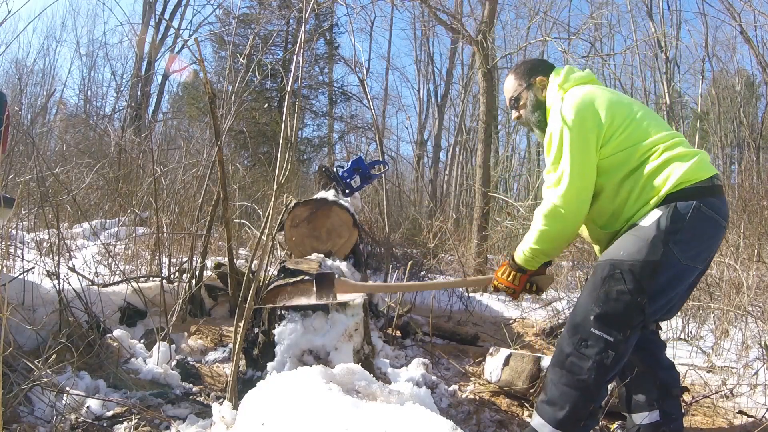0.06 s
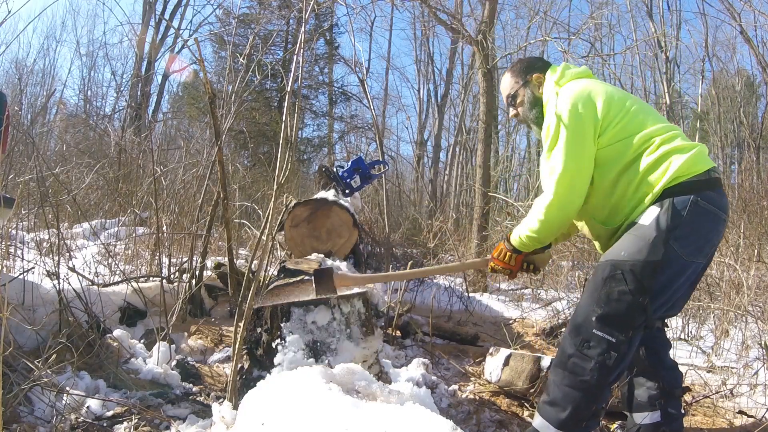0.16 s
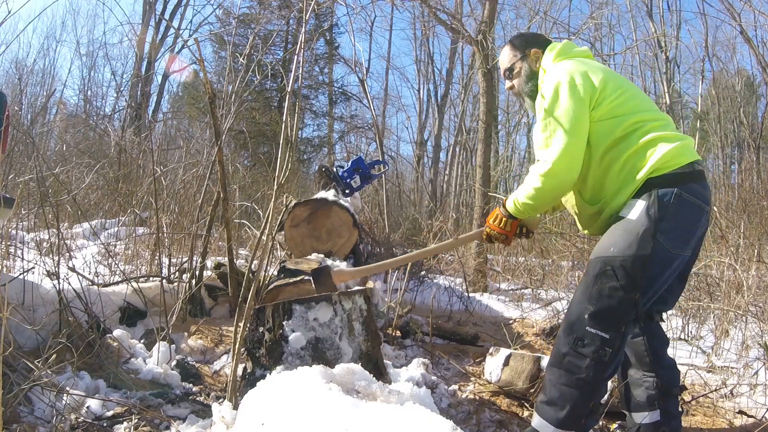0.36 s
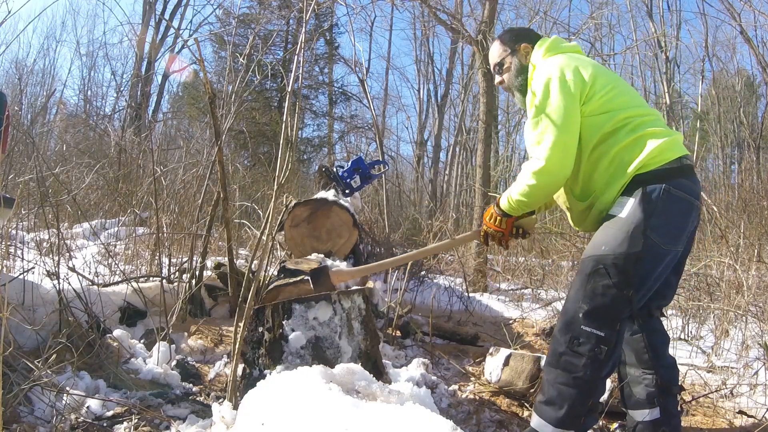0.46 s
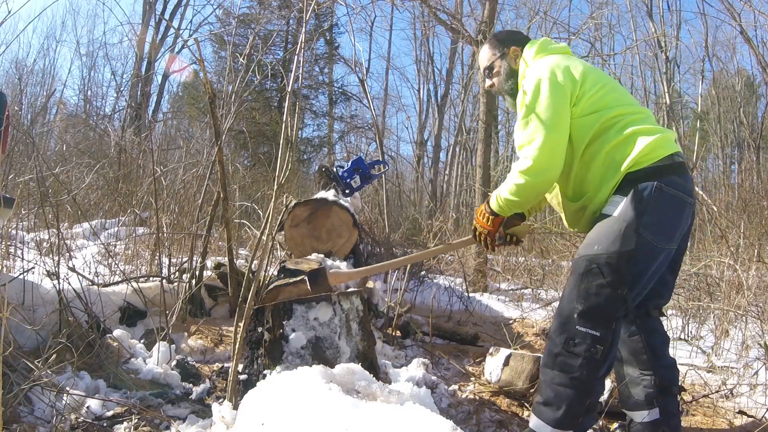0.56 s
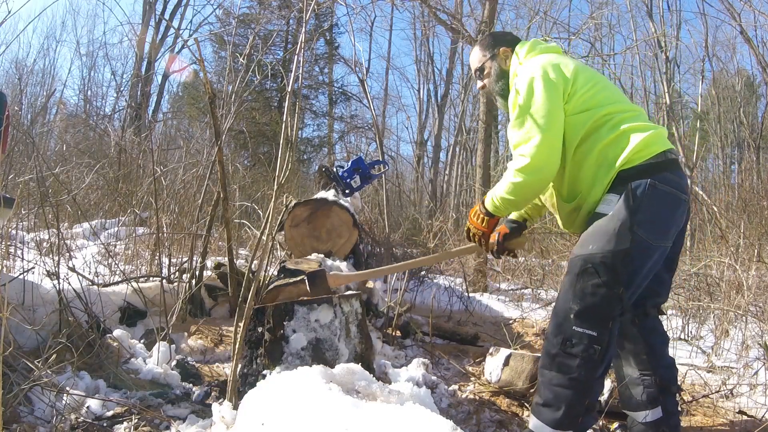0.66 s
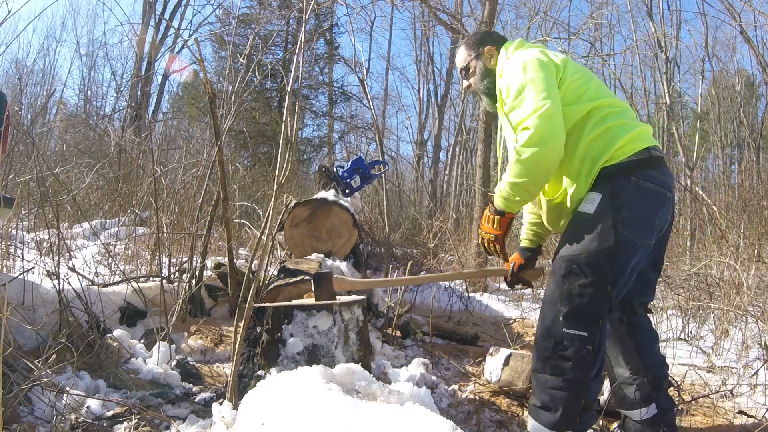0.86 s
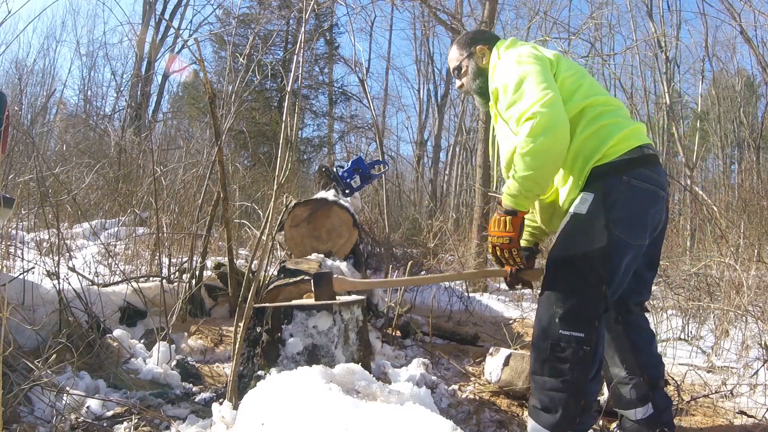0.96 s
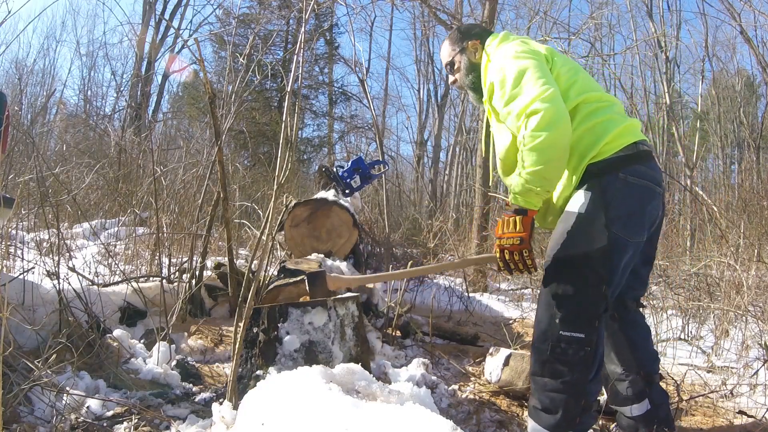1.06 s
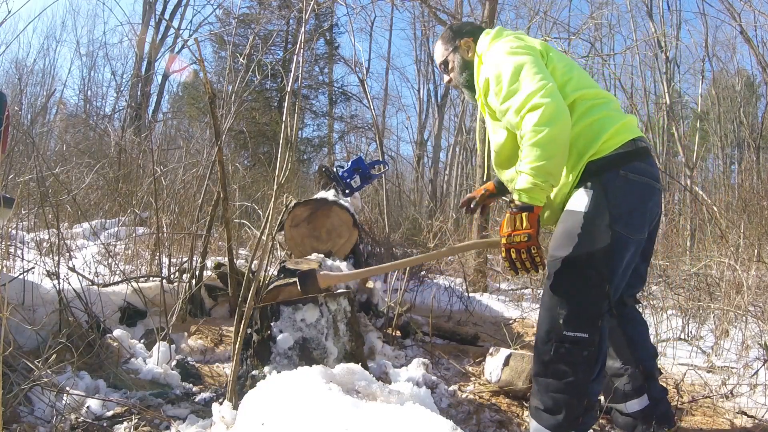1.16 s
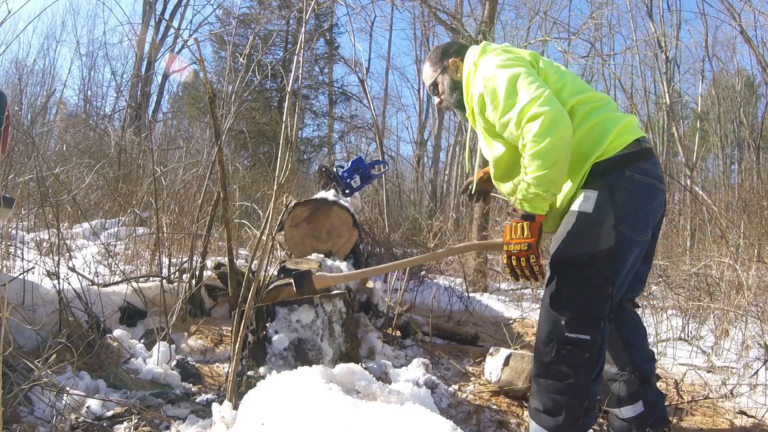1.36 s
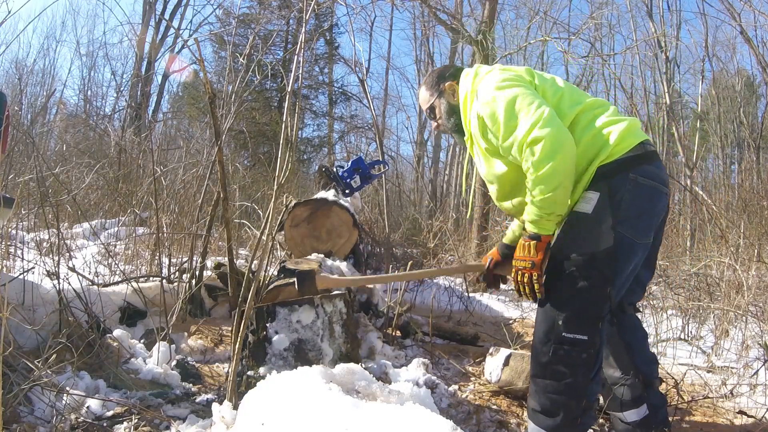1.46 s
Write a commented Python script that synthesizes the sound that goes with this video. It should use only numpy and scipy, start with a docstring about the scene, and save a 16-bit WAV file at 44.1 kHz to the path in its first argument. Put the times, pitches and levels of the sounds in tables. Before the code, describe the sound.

Outdoors in quiet woods, faint hiss and rustling precede one very loud, dry axe blow into wood, overloaded on a close small microphone, followed by scattered echoes, tiny snaps, soft woody knocks and sleeve rustle.

```python
"""Recorder hiss, a low rumble and grainy rustling (all shaped noise) lie under the whole scene.
In a quiet snowy wood an axe touches a log on a stump, then bites in and overloads a small recorder.
The log rings as fading sine tones, its fibres tear as gritty noise and the trees scatter echoes.
Two splinters snap; then the axe is worked loose with more ticks and with dull knocks.
Ticks are short noise bursts, knocks are bursts that also ring the log."""
import sys
import numpy as np
from scipy import signal
from scipy.fft import rfft, irfft
from scipy.io import wavfile
from scipy.ndimage import uniform_filter1d, minimum_filter1d

SR = 44100
rng = np.random.default_rng(int(sys.argv[2]) if len(sys.argv) > 2 else 0)


def convert_level_to_amplitude(level_db):
    """Map a level in decibels to its linear amplitude factor."""
    exponent = np.asarray(level_db, float) / 20
    return 10 ** exponent


def store_wav(level_fs):
    """Save 16-bit WAV to argv[1]."""
    pcm = np.round(np.clip(np.atleast_2d(level_fs), -1, 1) * 32767)
    wavfile.write(sys.argv[1], SR, pcm.T.astype(np.int16))


N = 66150  # length in samples

# Steady recorder hiss. Each row: frequency in Hz, relative level per Hz in dB.
HISS_SPECTRUM = [(90, 2.5), (150, -1), (300, -11), (700, -8), (1100, -14.5), (2000, -16.5), (4300, -24.5),
                 (5700, -24.5), (6450, -9.5), (7200, -16.5), (9500, -24), (13000, -28), (14000, -33)]
# Distant low rumble. Each row: frequency in Hz, relative level per Hz in dB.
RUMBLE_SPECTRUM = [(15, -30), (28, 2), (40, -1), (55, 1), (70, -7.5), (110, -21)]
HISS_DB, RUMBLE_DB = -47.5, -39

# How busily sleeves and gloves move. Each row: time in seconds, level in dB.
CLOTH_MOVES = [(0, -51.5), (.1, -57.5), (.35, -53), (.5, -63), (.57, -54), (.7, -48), (.8, -51), (.95, -67),
               (1.1, -57.5), (1.14, -51), (1.3, -47), (1.39, -48), (1.42, -59), (1.5, -68)]
# Low shuffle of the axe in the cut. Each row: time in seconds, level in dB.
AXE_SHUFFLE = [(0, -43), (.1, -51.5), (.4, -57), (.55, -61), (.62, -41), (.72, -41), (.82, -46), (1, -53.5),
               (1.18, -49.5), (1.27, -52), (1.35, -45), (1.45, -60), (1.5, -52)]
# Colour of the cloth. Each row: frequency in Hz, relative level per Hz in dB.
CLOTH_SPECTRUM = [(500, -12), (1200, -3), (2500, 1), (4000, -7), (5500, -2), (7000, -5.5), (10000, -15.5)]
# Colour of wood and snow. Each row: frequency in Hz, relative level per Hz in dB.
WOOD_SPECTRUM = [(70, -2.5), (150, 4.5), (320, 1), (700, -13), (1200, -10), (2500, -20)]

# How long the trees' echoes last. Each row: frequency in Hz, time to fall 60 dB in seconds.
TREE_DECAY = [(100, .5), (400, 0.87), (950, 1.16), (2000, 0.67), (6000, 0.84), (12000, 0.65)]
# Colour of the trees' echoes. Each row: frequency in Hz, relative starting level in dB.
TREE_SPECTRUM = [(100, -2), (150, 10), (400, -6), (650, 0.5), (980, 3), (1500, -2.5), (4000, -0.5),
                 (6400, -5.5), (10000, -5.5)]
TREES_DB, TREES_RING_DB = -28.5, -17  # the low ring carries less far than the crack

# Short bright ticks: the first two are splinters snapping, the rest come from handling the axe.
# Each row: start in seconds, level in dB, lowest frequency in Hz, highest frequency in Hz,
# time to fall 60 dB in seconds.
TICKS = [(0.167, -25.5, 800, 7060, 0.041), (.193, -31, 500, 6000, .04), (.2574, -40, 4200, 7000, 0.026),
         (.314, -35, 700, 6840, 0.038), (.387, -41.5, 1490, 6540, .05), (.46, -43, 4460, 7260, 0.025),
         (0.5812, -31, 890, 7050, 0.058), (0.6554, -27.5, 2500, 8400, 0.029),
         (.656, -30.5, 1500, 2600, 0.028), (0.6986, -31.5, 1500, 3150, 0.022),
         (.7265, -31.5, 1800, 3240, 0.014), (0.8924, -38, 795, 6900, 0.02),
         (1.1774, -41.5, 1110, 1970, .03), (1.2153, -45, 3500, 6500, 0.028),
         (1.3879, -35, 1010, 2950, 0.028)]
# Dull knocks of the axe in the wood. Each row: start in seconds, level in dB, lowest frequency in Hz,
# highest frequency in Hz, time to fall 60 dB in seconds.
KNOCKS = [(.29, -40, 700, 1190, 0.19), (0.313, -33.5, 740, 1703, 0.072), (.322, -30.5, 99, 296, 0.11),
          (.385, -39.5, 99.9, 200, .15), (.579, -34.5, 200, 1180, 0.11), (.611, -36.5, 200, 905, 0.17),
          (0.69, -30, 250, 1460, 0.058), (.702, -34, 180, 450, .07), (.7235, -30, 300, 1480, 0.062),
          (.796, -29.5, 440, 2290, 0.047), (1.183, -34, 90, 750, .07), (1.346, -37, 110, 600, 0.068)]
KNOCK_RING_DB = -8.5  # the log's ring, against the level of the knock
SNAP = 6.8  # height of the first contact, against the grit around it
MIC_HZ, MIC_WIDTH_HZ, MIC_DB = 6210, 510, 11  # a narrow lift in the microphone port, heard in bursts

# Log, stump and ground under a blow. Each row: starting pitch in Hz, level in dB,
# time to fall 60 dB in seconds, time constant of the rise in seconds.
LOG_MODES = [(47.6, -21, .22, .03), (82.6, -10.5, 0.12, 0.019), (137.9, 5, 0.063, 0.0065),
             (163.4, -10.5, 0.11, 0.0065), (279.6, -15.5, 0.072, 0.0064), (369, 5, 0.025, 0.0022),
             (618, -8.5, 0.0538, 0.0043), (700, -8, 0.046, 0.0014), (838.8, 6, 0.024, 0.0016),
             (1003, -8, 0.047, 0.0028), (1311, -7.5, 0.034, 0.00095), (1592, -10.5, 0.022, 0.00098),
             (1895, -4.5, 0.024, 0.00067), (2198, -11, 0.037, 0.00072), (2547, -14.5, 0.032, 0.00085)]
SAG, SAG_S = 0.044, 0.04  # after the blow the ring drops by this share of its pitch as the log settles
# Fibres tearing. Each row: frequency in Hz, relative level per Hz in dB.
CRACK_SPECTRUM = [(300, 4), (1000, -1.5), (3000, -4.5), (4500, -13), (6300, -1.5), (8000, -22.5),
                  (13000, -29), (16000, -47)]
# Splinters crackling on after the blow. Each row: frequency in Hz, relative level per Hz in dB.
SPLINTER_SPECTRUM = [(250, -3), (600, 0.5), (1100, -1), (2500, -9), (4500, -12.5), (6300, -7), (7500, -19)]
CRACK_DB, CRACK_T60_S = -5, 0.035  # against the level of the chop
SPLINTER_DB, SPLINTER_T60_S = -26, 0.14  # against the level of the chop
TOUCH_S, TOUCH_DB, TOUCH_HIGH_HZ = 0.1287, -20, 3500  # the edge first touches the bark
CHOP_S, CHOP_DB = 0.1344, 14

AHEAD_S, TRIP_DB = 0.0295, -12  # the gain control sees sound above this level this early
DUCK_DB, DUCK_S = 5.5, 0.061  # depth and time constant of the quick recovery
HOLD_DB, HOLD_S = 5.5, 2.2  # depth and time constant of the slow recovery
CEILING = 1.04  # overload level


def evened(x):
    """Scales a sound to an average (rms) strength of one."""
    return x / np.sqrt(np.mean(x ** 2) + 1e-20)


def read(points, hz):
    """Reads a table between its rows, spacing frequencies by their logarithm."""
    f, value = np.transpose(points)
    return np.interp(np.log(hz + 1), np.log(f + 1), value)


def curve(points):
    """Turns a table of times and levels into a smooth volume curve."""
    s, db = np.transpose(points)
    return convert_level_to_amplitude(np.interp(np.arange(N) / SR, s, db))


def add(mix, s, sound):
    """Lays a sound into the mix at a start time, cutting off what runs past the end."""
    part = mix[round(s * SR):][:len(sound)]
    part += sound[:len(part)]


def coloured(x, points):
    """Filters by a spectrum table, steep beyond its ends."""
    hz = np.fft.rfftfreq(len(x), 1 / SR)
    ends = [(points[0][0] / 2, -70)] + list(points) + [(points[-1][0] * 1.1, -90)]
    return evened(irfft(rfft(x) * convert_level_to_amplitude(read(ends, hz)), len(x)))


def gritty(count, per_s, spread_db, smooth):
    """Steady noise plus sparse clicks of uneven size."""
    boost_db = spread_db * np.minimum(rng.exponential(1, count), 4)
    size = convert_level_to_amplitude(boost_db) * (rng.random(count) < per_s / SR)
    clicks = evened(size * rng.choice([-1., 1.], count))
    return clicks + smooth * rng.standard_normal(count)


def hiss_and_rumble():
    """Steady recorder hiss and a distant low rumble, each made of shaped noise."""
    hiss = convert_level_to_amplitude(HISS_DB) * coloured(rng.standard_normal(N), HISS_SPECTRUM)
    rumble = convert_level_to_amplitude(RUMBLE_DB) * coloured(rng.standard_normal(N), RUMBLE_SPECTRUM)
    return hiss + rumble


def rustle():
    """Cloth above, wood and snow below: grainy noise that swells with movement."""
    cloth = curve(CLOTH_MOVES) * coloured(gritty(N, 2800, 3.6, 0.62), CLOTH_SPECTRUM)
    shuffle = curve(AXE_SHUFFLE) * coloured(gritty(N, 800, 2., 1.), WOOD_SPECTRUM)
    return cloth + shuffle


def trees(x):
    """Scattered echoes, each band dying at its own speed."""
    hz, t, z = signal.stft(gritty(SR, 1500, 3.8, 0.15), SR, nperseg=256)
    fading_db = read(TREE_SPECTRUM, hz)[:, None] - 60 * t / read(TREE_DECAY, hz)[:, None]
    tail = signal.istft(z * convert_level_to_amplitude(fading_db), SR, nperseg=256)[1]
    tail = tail * np.minimum(np.arange(len(tail)) / (0.0085 * SR), 1)  # echoes build up over 8.5 ms
    return convert_level_to_amplitude(TREES_DB) * signal.fftconvolve(x, tail / np.linalg.norm(tail))[:N]


def burst(db, low_hz, high_hz, t60, rise):
    """A short gritty burst between two pitches, with one snap as it reaches full strength."""
    t = np.arange(8192) / SR
    f = np.fft.rfftfreq(len(t), 1 / SR) + 1  # the 1 avoids dividing by zero
    edges = (1 + (low_hz / f) ** 4) * (1 + (f / high_hz) ** 6)
    mic_lift = convert_level_to_amplitude(MIC_DB * np.exp(-((f - MIC_HZ) / MIC_WIDTH_HZ) ** 2))
    band = mic_lift / edges / np.sqrt(f)
    snap = SNAP * (np.arange(len(t)) == round(rise * SR))
    grit = gritty(len(t), 3000, 3.2, 0.97) + snap
    return convert_level_to_amplitude(db - 60 * t / t60) * np.minimum(t / rise, 1) * evened(irfft(rfft(grit) * band))


def ring(sag, weight):
    """The log's own tones after a blow, each swelling, fading and sinking in pitch by the sag."""
    t = np.arange(SR // 2) / SR
    slowed = t - sag * (t - SAG_S * (1 - np.exp(-t / SAG_S)))
    total = np.zeros(len(t))
    for hz, db, t60, rise in LOG_MODES:
        loudness = weight(hz) * convert_level_to_amplitude(db - 60 * t / t60) * (1 - np.exp(-t / rise))
        total += loudness * np.sin(2 * np.pi * hz * slowed)
    return total


def ticks_and_knocks():
    """Ticks of splinters and handling, and knocks that also ring the log in their own range."""
    out = np.zeros(N)
    for s, db, low_hz, high_hz, t60 in TICKS:
        add(out, s, burst(db, low_hz, high_hz, t60, 0.0012))
    for s, db, low_hz, high_hz, t60 in KNOCKS:
        add(out, s, burst(db, low_hz, high_hz, t60, 0.0025))
        log_ring = ring(0, lambda f: 1 / (1 + (low_hz / f) ** 4) / (1 + (f / high_hz) ** 4))
        add(out, s, convert_level_to_amplitude(db + KNOCK_RING_DB) * log_ring)
    return out


def chop():
    """Touch, blow and tearing fibres: returns the log's ring and the crack apart."""
    body, crack, t = np.zeros(N), np.zeros(N), np.arange(SR // 2) / SR
    tear = coloured(gritty(len(t), 4000, 3.3, 0.67), CRACK_SPECTRUM)
    tear *= np.minimum(t / 0.0028, 1)  # the tear opens over 2.8 ms
    tear *= convert_level_to_amplitude(CRACK_DB - 60 * t / CRACK_T60_S)
    splinters = coloured(gritty(len(t), 900, 3.1, 0.5), SPLINTER_SPECTRUM)
    tear += convert_level_to_amplitude(SPLINTER_DB - 60 * t / SPLINTER_T60_S) * splinters
    add(crack, TOUCH_S, burst(TOUCH_DB, 530, TOUCH_HIGH_HZ, 0.2, 0.0043))
    add(crack, CHOP_S, convert_level_to_amplitude(CHOP_DB) * tear)
    add(body, CHOP_S, convert_level_to_amplitude(CHOP_DB) * ring(SAG, lambda hz: 1))
    return body, crack


def scene():
    """Adds the chop, the ticks and knocks, their echoes and the background into one channel."""
    body, crack = chop()
    crack = crack + ticks_and_knocks()
    echoes = trees(crack + convert_level_to_amplitude(TREES_RING_DB) * body)
    return (body + crack + echoes + rustle() + hiss_and_rumble())[None]


def top_cut(x):
    """Nothing passes above the cut-off."""
    return signal.sosfilt(signal.butter(12, 16250, fs=SR, output="sos"), x)


def record(dry):
    """Look-ahead gain control ducks just before a loud sound and recovers in two stages; then overload."""
    ahead, t = round(AHEAD_S * SR), np.arange(N) / SR
    loud = abs(dry[0]) > convert_level_to_amplitude(TRIP_DB)
    # one wherever a loud sample lies within the look-ahead
    coming = -minimum_filter1d(-1. * loud, ahead + 1, origin=-(ahead // 2))
    since = t - np.maximum.accumulate(np.where(coming > 0, t, -99.))  # seconds since the last trip
    duck_db = DUCK_DB * np.exp(-since / DUCK_S) + HOLD_DB * np.exp(-since / HOLD_S)
    # the gain is raised by HOLD_DB throughout, so before any trip the scene is louder
    levelled = dry / convert_level_to_amplitude(uniform_filter1d(duck_db, 60) - HOLD_DB)
    return top_cut(np.clip(levelled, -CEILING, CEILING))


dry = scene()
out = record(dry)
store_wav(out)
```